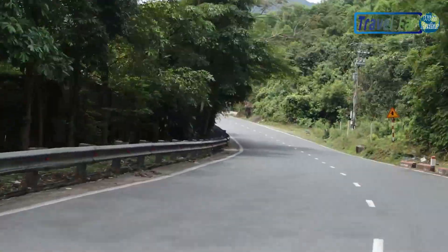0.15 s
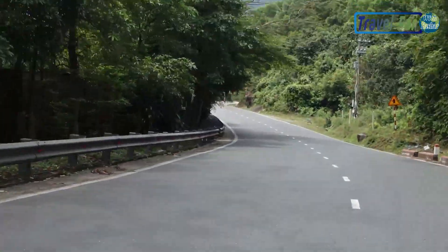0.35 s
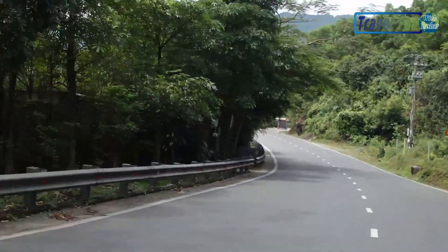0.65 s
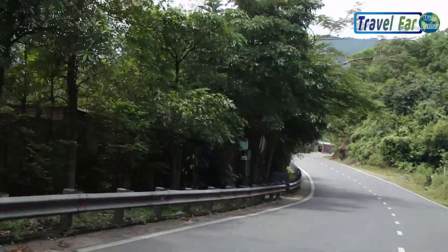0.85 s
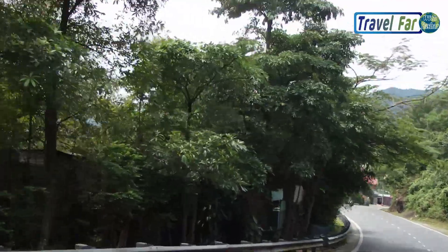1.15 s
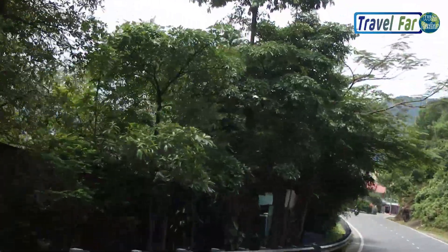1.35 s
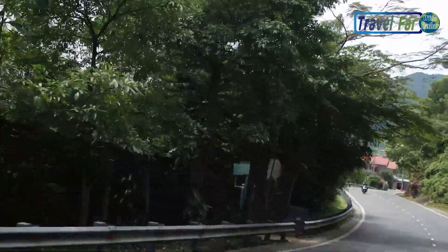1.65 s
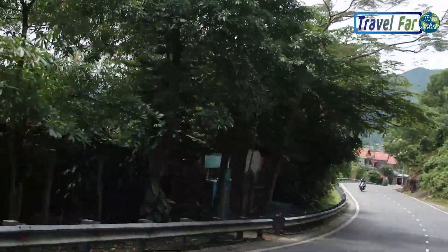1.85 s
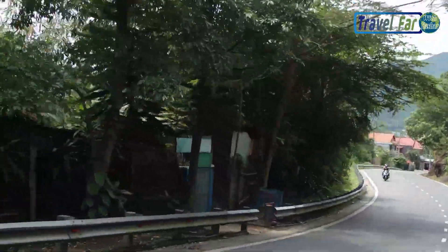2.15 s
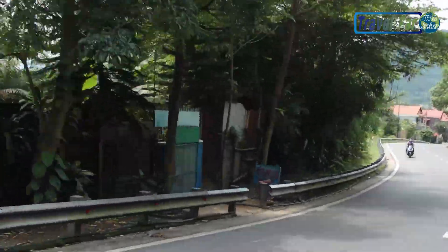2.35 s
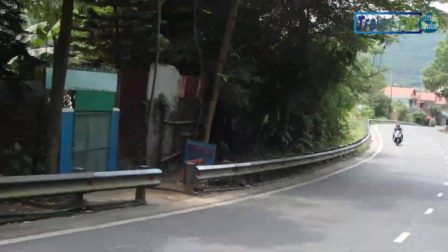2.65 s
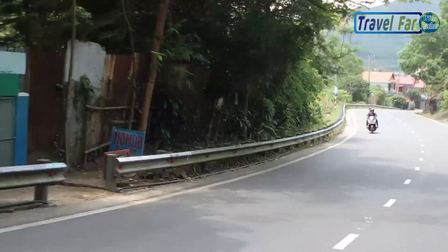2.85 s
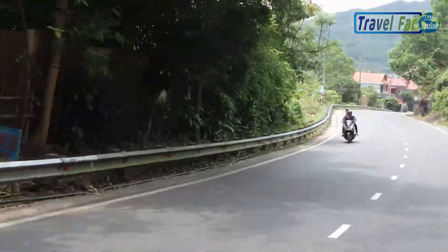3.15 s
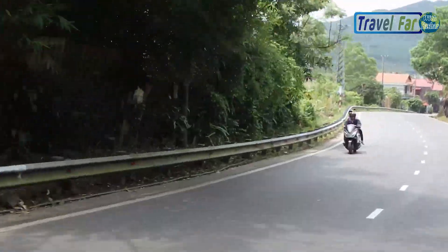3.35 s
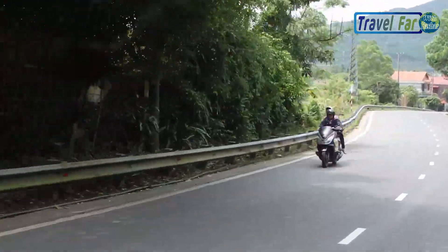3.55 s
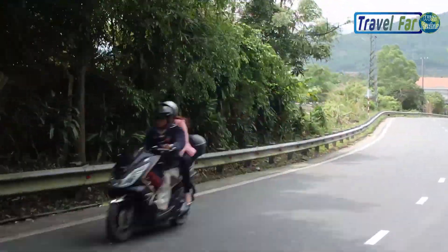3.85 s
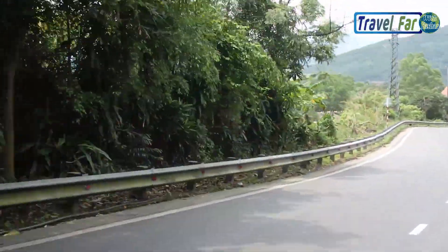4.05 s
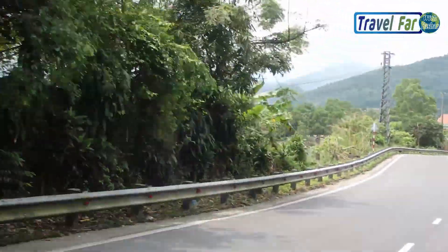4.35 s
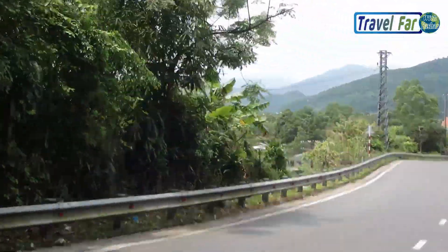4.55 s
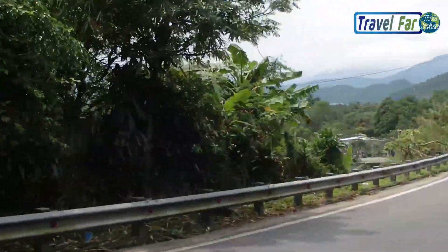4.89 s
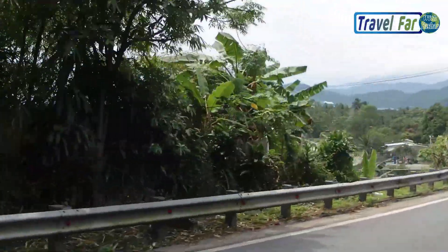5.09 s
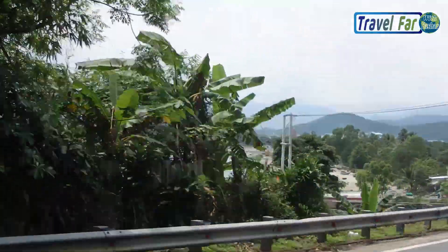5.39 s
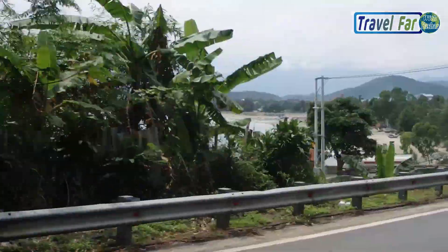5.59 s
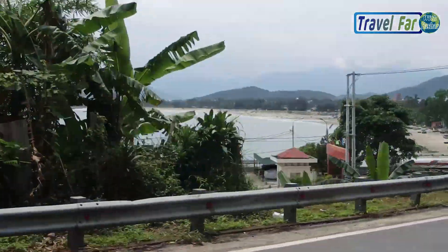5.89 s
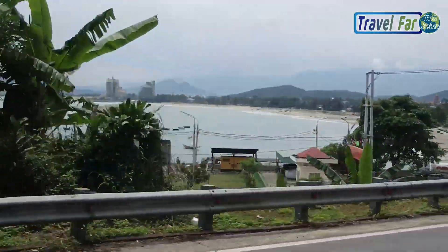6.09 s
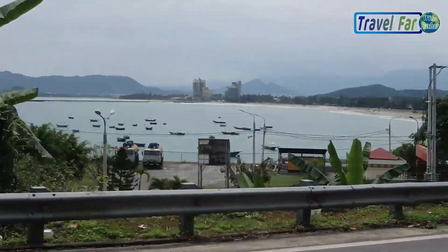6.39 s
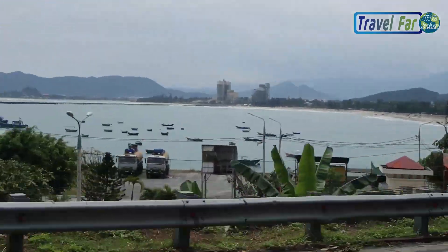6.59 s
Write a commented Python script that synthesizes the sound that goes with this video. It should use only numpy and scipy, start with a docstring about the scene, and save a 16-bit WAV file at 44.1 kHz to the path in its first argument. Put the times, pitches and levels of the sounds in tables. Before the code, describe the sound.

From the saddle, a single-cylinder motorcycle thumps and hums down a winding road, with hard wind gusts buffeting the microphone and loose metal clattering.

```python
"""A single-cylinder motorcycle rolls down a winding road, heard from the saddle.
Its exhaust thumps once per firing, from a stack of cosines, over a steady hum at four times that rate.
Filtered noise makes the growl, the rush of air and tyres and the swishes; ringing metal modes make the clatter.
A thin tone slides down once as a whistle, and gusts of low, tearing noise buffet the microphone.
At listed moments, placed for hard gusts and loud thumps, the whole sound ducks, then swells back steadily."""
import sys
import numpy as np
from scipy import signal
from scipy.fft import rfft, irfft
from scipy.io import wavfile
from scipy.ndimage import uniform_filter1d

SR = 44100
rng = np.random.default_rng(int(sys.argv[2]) if len(sys.argv) > 2 else 0)


def put_to_file(sound):
    """Save the sound as 16-bit audio at rate SR, in the file named by the first command-line argument."""
    columns = np.atleast_2d(sound).T  # one column per channel
    safe = np.clip(columns, -1, 1)
    whole_steps = np.round(safe * 32767)
    wavfile.write(sys.argv[1], SR, whole_steps.astype(np.int16))


N = 296772
TIME = np.arange(N) / SR  # s
HZ = np.arange(N // 2 + 1) * SR / N  # frequencies of the spectrum

# engine speed: (time [s], firing rate [firings per s])
ENGINE_SPEED = [(0.0, 24.875), (0.63, 24.042), (2.24, 23.411), (2.5, 25.577), (2.89, 27.227),
                (3.88, 28.421), (4.61, 28.07), (5.23, 26.563), (6.73, 26.734)]
# load on the engine: (time [s], exhaust thump [dB], exhaust hum [dB])
ENGINE_LOAD = [(0, -20, -8.5), (.55, -15.5, -8.7), (1.3, -17, -12), (1.72, -15.5, -9), (2.25, -18, -12.5),
               (2.55, -23, -16.5), (3.05, -26.5, -12.5), (3.6, -27, -14), (4.25, -28, -14),
               (4.7, -28.5, -17.5), (4.85, -25, -13.5), (5.7, -22, -12), (6.73, -26.5, -14)]
# shape of an exhaust thump: (multiple of the firing rate [1], level [dB])
THUMP_SHAPE = [(1, -17), (2, -21), (3, 2.5), (5, -2), (6, -12), (7, -17), (8, -19.5), (9, -18), (10, -21.5),
               (12, -23.5), (13, -22.5)]
# engine case resonances: (frequency [Hz], width [Hz], level against the broad sound [dB])
CASE_RESONANCES = [(271.3, 3.9, -2.5), (310.5, 21, -3.5), (720, 350, -6.5), (1033, 31, -9), (1363, 29, 0.5),
                   (1500, 8.7, -2.5), (1664, 134, -7), (1945, 100, -7.5), (2510, 27, -1.5),
                   (3070, 120, -12.5)]
# spectrum of the engine growl: (frequency [Hz], relative level [dB])
GROWL_SPECTRUM = [(20, 9.5), (50, -6.5), (150, 3), (200, 0), (300, -1.5), (400, -2), (650, -4.5),
                  (800, -9.5), (1500, -6.5), (2100, -12), (3500, -30.5), (16000, -66)]
# spectrum of the rush: (frequency [Hz], relative level [dB])
RUSH_SPECTRUM = [(20, -41), (500, -63), (1200, -3), (2100, 0.5), (2800, 3.5), (4500, 1), (8000, 1.5),
                 (16000, -8)]
# loose parts rattle on the bigger bumps: (time [s], level [dB])
BUMP_RATTLES = [(0.747, -9.5), (1.138, -7), (1.375, -9), (1.397, -8), (1.753, -10), (1.777, -13),
                (1.886, -2), (2.231, -9), (2.869, -12), (2.98, -8), (5.028, -8)]
# modes of the rattling metal parts: (frequency [Hz], level [dB], time to fade by 60 dB [s])
METAL_MODES = [(2507, -12, 0.024), (3037, -11.5, 0.012), (4126, -18.5, 0.093), (4560, -6.5, 0.011),
               (4790, -5.5, 0.014), (5880, -7.5, 0.016), (6220, -9, 0.044), (6880, -9.5, 0.013),
               (6880, -8, 0.017), (7150, -8, .035), (7420, -8.5, 0.027), (8120, 1, 0.012),
               (8580, -13, 0.016), (9780, -8, 0.0087), (10050, -17.5, 0.0095), (11060, -16, 0.0091)]
# gusts on the microphone: (time [s], half length of the core [s], level [dB], left minus right [dB])
WIND_GUSTS = [(0.04, 0.019, -9, -9), (0.081, 0.017, 3, -0.5), (.19, 0.033, -1.5, -3),
              (0.273, 0.0097, -6, -13), (0.668, 0.035, -14.5, -12), (1.038, 0.0076, -6, -7),
              (2.268, 0.014, -7.5, -4), (2.327, 0.014, -6, 3), (2.419, 0.0099, 1, 2.5),
              (2.627, 0.0083, -11, 18), (2.917, 0.0046, -7.5, 16.5), (3.066, 0.026, -8.5, 8),
              (3.295, 0.032, -2.5, 1), (3.372, 0.014, 11, 2), (3.401, 0.012, 9, 2), (3.462, 0.019, 2.5, 7),
              (3.514, 0.019, 0.5, 1.5), (4.107, 0.01, -2, 3.5), (6.196, 0.0063, -11, 19),
              (6.262, 0.019, -4, 6.5), (6.53, 0.047, -7, 5), (6.577, 0.0064, 3.5, 1),
              (6.601, 0.0073, 6.5, -0.5), (6.632, 0.02, 2.5, 3.5)]
# spectrum of the wind's eddies: (frequency [Hz], relative level [dB])
WIND_SPECTRUM = [(10, -15.5), (30, 4.5), (70, 4), (150, 1), (300, -8), (500, -18), (1000, -35), (3000, -49),
                 (16000, -83)]
# spectrum of the wind's tearing: (frequency [Hz], relative level [dB])
TEAR_SPECTRUM = [(20, 0), (300, 4), (600, -4.5), (1300, -17.5), (3000, -36.5), (16000, -63)]
# brief airy swishes: (time [s], half length [s], level [dB])
SWISH_PUFFS = [(0.806, 0.012, -20), (0.96, 0.034, -16.5)]
# spectrum of the swishes: (frequency [Hz], relative level [dB])
SWISH_SPECTRUM = [(20, -50), (2500, -10), (4200, -12), (5200, 8), (6200, -6), (8000, -1), (12000, -26)]
# left microphone port and its cavity notches: (frequency [Hz], gain [dB])
LEFT_PORT_GAIN = [(100, 2.5), (400, 2.5), (2400, 2.5), (3120, 8), (3480, -1.5), (4050, 4), (4600, -1.5),
                  (5300, -17), (6000, -8.5), (7500, -15), (10000, -14), (12000, -22), (16000, -38)]
# right microphone port and its cavity notches: (frequency [Hz], gain [dB])
RIGHT_PORT_GAIN = [(100, 1.5), (400, 0), (2000, -0.5), (2700, 4), (3380, 8), (3650, -1.5), (3900, -19),
                   (4500, -2.5), (4900, -21), (5300, -31), (6300, -28.5), (10000, -32.5), (16000, -41.5)]
# the whole sound ducks at a hard gust or a loud thump: (time [s], level it drops to [dB])
LEVEL_DUCKS = [(0.081, -23), (1.62, -8.5), (1.785, -10), (2.267, -12.5), (2.425, -14), (2.921, -11.5),
               (3.273, -12.5), (3.358, -26.5), (5.402, -5), (5.639, -5.5), (5.928, -6), (6.213, -11),
               (6.273, -14.5), (6.598, -20.5)]

# the level swells back at a steady rate up to its full value; DUCK_S is the time its steps are smoothed over
START_DB, FULL_DB, RECOVERY_DB_PER_S, DUCK_S = -12.5, -2, 12.5, 0.0096
HISS_DB, CUTOFF_HZ = -44.5, 15700  # microphone hiss, and the top of the sound
GUST_SKIRT = 2.7  # a gust builds and fades as this power of the time from its core
JOLTS_PER_S, JOLT_DB = 3.1, -17.5  # smaller bumps come at random
# the whistle: its loudest moment, its pitch and level there, its fall and its envelope
WHISTLE_S, WHISTLE_HZ, WHISTLE_DB = 5.24, 2500, -25.5
WHISTLE_FALL_OCTAVES_PER_S, WHISTLE_ATTACK_S, WHISTLE_RELEASE_S = 5.8, 0.018, 0.075
# at the cruising thump, the growl's relative level; then its share of the thump's swing in dB
CRUISE_DB, GROWL_DB, GROWL_SHARE = -22, 3, 0.28


def from_db(db):
    """Turn decibels into a plain factor."""
    return 10 ** (np.asarray(db) / 20)


def rms_one(x):
    """Scale a sound to an average (RMS) strength of 1."""
    return x / np.sqrt(np.mean(x ** 2) + 1e-20)


def in_time(rows):
    """Each column of a curve at every sample."""
    s, *columns = np.transpose(rows)
    return [np.interp(TIME, s, column) for column in columns]


def colour(x, points):
    """Filter with the given gains, acting only after the sound arrives (minimum phase)."""
    hz, db = np.transpose(points)
    gain = from_db(np.interp(np.log(HZ + 1), np.log(hz), db))
    # folding the cepstrum forward gives the minimum phase
    cepstrum = irfft(np.log(gain), N)
    cepstrum[1:N // 2] *= 2
    cepstrum[N // 2 + 1:] = 0
    return irfft(rfft(x) * np.exp(rfft(cepstrum)), N)


def drift(rate):
    """Slow random wandering with a spread of 1; rate [Hz] is where it starts to smooth out."""
    noise = rfft(rng.standard_normal(N))
    return rms_one(irfft(noise / (1 + (HZ / rate) ** 2), N))


def stereo_noise(side_db):
    """White noise common to both sides, plus a part that differs."""
    mid, side = rng.standard_normal((2, N))
    return rms_one(mid + from_db(side_db) * side * [[1], [-1]])


def gust_shape(s, width):
    """A gust has a sharp core with long skirts."""
    return np.hypot(1, (TIME - s) / (width * np.sqrt(GUST_SKIRT))) ** -GUST_SKIRT


def wind(breeze_db=-25, breeze_spread_db=2.5, lumpy_db=4.0, tear_db=-17, tear_growth=2.6,
         flutter_hz=33, flutter_db=1.9):
    """Eddies push on the two ports partly separately; tearing grows faster than the gust, so it reaches higher."""
    shapes = []
    for s, width, db, pan in WIND_GUSTS:
        sides = from_db([[db + pan / 2], [db - pan / 2]])
        shapes.append(sides * gust_shape(s, width))
    gust = np.max(shapes, axis=0)
    # vortices leave the housing at an uneven beat
    shedding = np.cumsum(flutter_hz * (1 + 0.283 * drift(10.13))) / SR
    gust = gust * from_db(flutter_db * np.cos(2 * np.pi * shedding))
    eddies = colour(stereo_noise(side_db=-3.0), WIND_SPECTRUM)
    # even out the strength of the eddies, so that the gusts set it
    eddies /= np.sqrt(uniform_filter1d(np.mean(eddies ** 2, axis=0), size=900))
    tearing = rms_one(colour(stereo_noise(side_db=-1.5), TEAR_SPECTRUM))
    tearing = tearing * from_db(lumpy_db * drift(130))
    breeze = from_db(breeze_db + breeze_spread_db * np.array([drift(12), drift(31)]))
    return np.hypot(gust, breeze) * eddies + from_db(tear_db) * gust ** tear_growth * tearing


def bell(s, width):
    """A smooth rise and fall around a moment."""
    return np.exp(-0.5 * np.minimum(((TIME - s) / width) ** 2, 200))


def swishes():
    """Short puffs of high hiss: coloured noise that swells and fades."""
    puffs = sum(from_db(db) * bell(s, width) for s, width, db in SWISH_PUFFS)
    return puffs * rms_one(colour(stereo_noise(side_db=-14), SWISH_SPECTRUM))


def whistle(waver=0.015, flicker_db=2):
    """A thin, unsteady tone comes in quickly and fades as it slides down."""
    age = np.clip(TIME - WHISTLE_S, -0.5, 1)
    hz = WHISTLE_HZ * 2 ** (-WHISTLE_FALL_OCTAVES_PER_S * age) * (1 + waver * drift(165.5))
    envelope = np.exp(np.minimum(age / WHISTLE_ATTACK_S, -age / WHISTLE_RELEASE_S))
    tone = np.sqrt(2) * np.sin(2 * np.pi * np.cumsum(hz) / SR)
    return from_db(WHISTLE_DB + flicker_db * drift(60)) * envelope * tone


def rattles(cycle, tick_db=-29, tick_spread_db=9.5, loose_per_s=70, bounce_s=0.0043, mode_spread_db=1.5):
    """Valves tick twice a cycle and loose parts chatter; each touch bounces and rings the metal modes."""
    valve_ticks = np.diff(np.floor(2 * cycle), prepend=0)
    touches = valve_ticks + (rng.random(N) < loose_per_s / SR)
    hits = touches * from_db(tick_db + tick_spread_db * np.clip(rng.standard_normal(N), -2, 2))
    hits += from_db(JOLT_DB) * (rng.random(N) < JOLTS_PER_S / SR)
    for s, db in BUMP_RATTLES:
        hits[int(s * SR)] += from_db(db)
    # each hit becomes a fading burst of noise
    contact = signal.lfilter([1], [1, -np.exp(-1 / (bounce_s * SR))], hits + 1e-18)
    contact *= rng.standard_normal(N) / np.sqrt(bounce_s * SR)
    out = np.zeros(N)
    for hz, db, t60 in METAL_MODES:
        fade = from_db(-60 / (t60 * SR))  # per sample
        turn = 2 * np.pi * hz / SR  # radians per sample
        # the strength of a mode changes every 512 samples
        chance = np.repeat(rng.standard_normal(N // 512 + 1), 512)[:N]
        strength = from_db(db + mode_spread_db * chance)
        out += signal.lfilter([np.sin(turn)], [1, -2 * fade * np.cos(turn), fade * fade], contact * strength)
    return out


def case(x):
    """Narrow resonances of the engine case stand out of the broad sound."""
    peaks = sum(from_db(db) / (1 + 2j * (HZ - hz) / width) for hz, width, db in CASE_RESONANCES)
    return irfft(rfft(x) * (1 + peaks), N)


def knocks(cycle, ring_s=0.02, uneven_db=2.0):
    """Every firing shakes the case with the same dense ring, at a strength of its own."""
    firings = np.diff(np.floor(cycle), prepend=0) * from_db(uneven_db * drift(21))
    age = TIME[:SR // 8]
    ring = rng.standard_normal(len(age)) * np.sqrt(age) * np.exp(-age / ring_s)  # builds up, then dies away
    return rms_one(signal.fftconvolve(firings, ring)[:N])


def engine_noise(cycle, growl_db):
    """Gas, drive and tyre noise, throbbing with the strokes of the piston, over the rasp of the firings."""
    throb_db = 1.2 * np.cos(8 * np.pi * cycle - 1) + 0.6 * np.sin(2 * np.pi * cycle)
    growl = stereo_noise(side_db=-34) * from_db(throb_db + 1.35 * drift(47))
    growl = growl + from_db(-3.5) * knocks(cycle, ring_s=0.02)
    rush = stereo_noise(side_db=-11) * from_db(throb_db + 1.0 * drift(140))
    rush = rush + from_db(-3.5) * knocks(cycle, ring_s=0.069)
    growl = from_db(growl_db - 23.0) * rms_one(colour(growl, GROWL_SPECTRUM))
    rush = from_db(-21.5) * rms_one(colour(rush, RUSH_SPECTRUM))
    return case(growl + rush)


def exhaust(cycle, thump_db, hum_db, uneven_db=0.66, hum_waver_db=1.4, jitter=0.011, crank_db=-23.0):
    """Low multiples peak together at each firing; the silencer hums at the fourth, the crank shakes at the second."""
    angle = 2 * np.pi * (cycle + jitter * drift(11))  # jitter is in cycles
    thump = sum(from_db(db) * np.cos(round(k) * angle) for k, db in THUMP_SHAPE)
    thump = from_db(thump_db + uneven_db * drift(35)) * thump
    hum = from_db(hum_db + hum_waver_db * drift(27)) * np.cos(4 * angle)
    crank = from_db(crank_db) * np.cos(2 * angle)
    return np.sqrt(2) * (case(thump + hum) + crank)


def scene():
    """The engine speed sets the beat and its load the weight of thump, hum and growl; the wind comes on top."""
    firing_rate, = in_time(ENGINE_SPEED)
    thump_db, hum_db = in_time(ENGINE_LOAD)
    growl_db = GROWL_DB + GROWL_SHARE * (thump_db - CRUISE_DB)
    cycle = np.cumsum(firing_rate) / SR  # firings so far
    motorcycle = exhaust(cycle, thump_db, hum_db) + engine_noise(cycle, growl_db) + rattles(cycle)
    return motorcycle + swishes() + whistle() + wind()


def ducking():
    """Level in dB: it drops at once at each listed moment and climbs back steadily."""
    level_db = np.minimum(START_DB + RECOVERY_DB_PER_S * TIME, FULL_DB)
    for s, db in LEVEL_DUCKS:
        recovery_db = np.minimum(db + RECOVERY_DB_PER_S * (TIME - s), FULL_DB)
        level_db = np.where(TIME < s, level_db, recovery_db)
    return level_db


def record(dry):
    """Each port colours its side; the level ducks and swells, peaks are clipped, the top is cut."""
    ports = np.array([colour(dry[0], LEFT_PORT_GAIN), colour(dry[1], RIGHT_PORT_GAIN)])
    hiss = from_db(HISS_DB) * rng.standard_normal((2, N))
    level_db = uniform_filter1d(ducking(), size=max(1, int(DUCK_S * SR)))
    loud = np.clip((ports + hiss) * from_db(level_db), -1, 1)
    top_cut = signal.ellip(10, 0.2, 90, CUTOFF_HZ, fs=SR, output="sos")
    return signal.sosfilt(top_cut, loud)


dry = scene()
out = record(dry)
put_to_file(out)
```